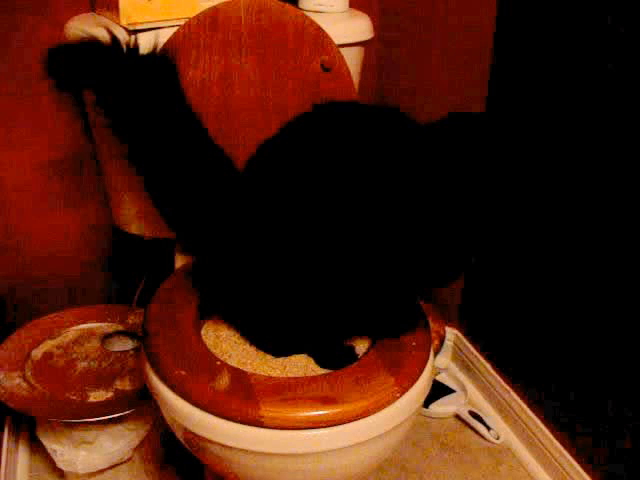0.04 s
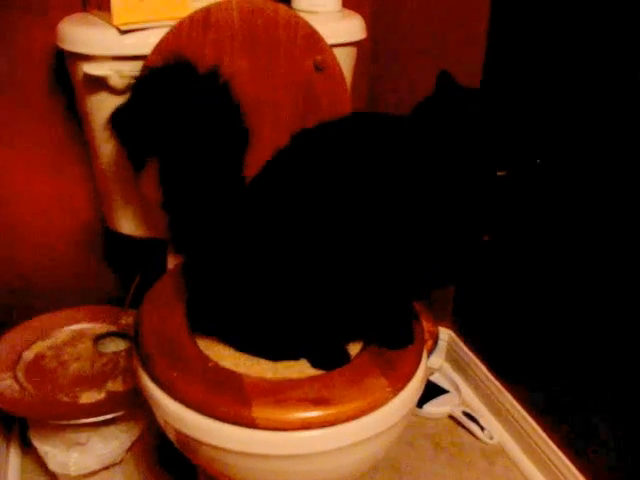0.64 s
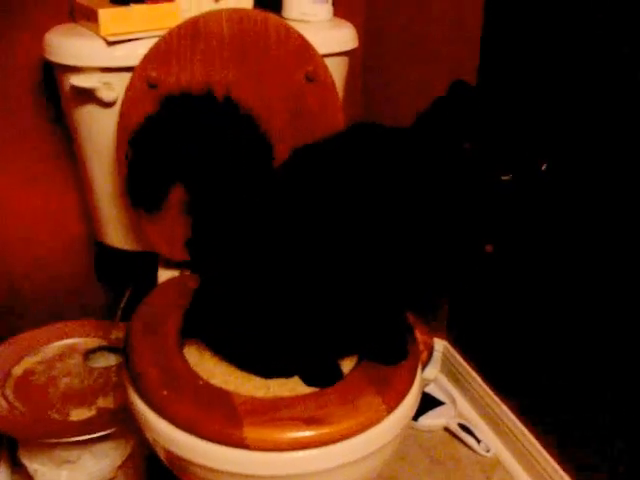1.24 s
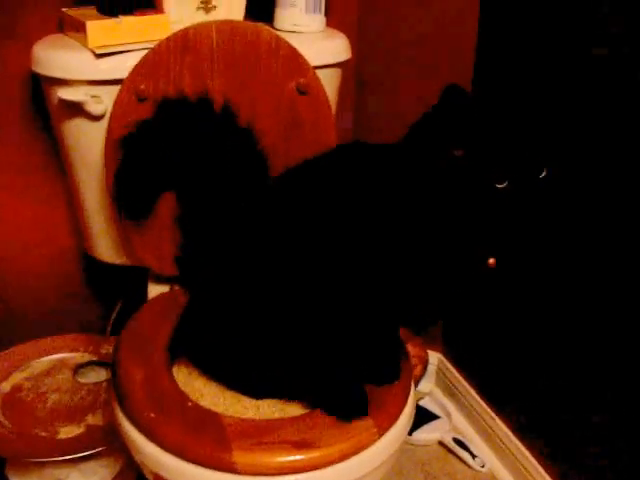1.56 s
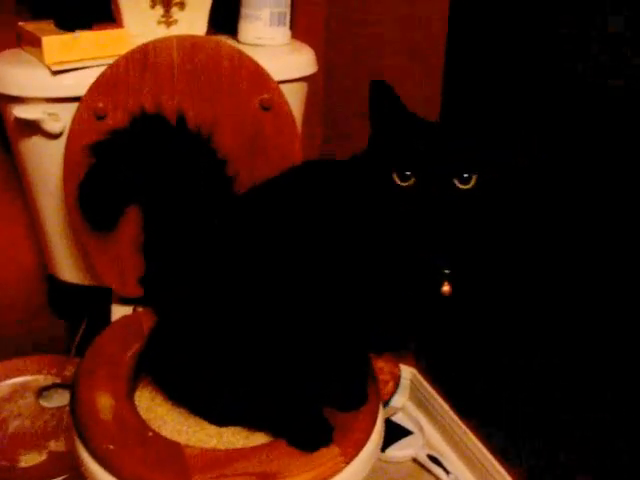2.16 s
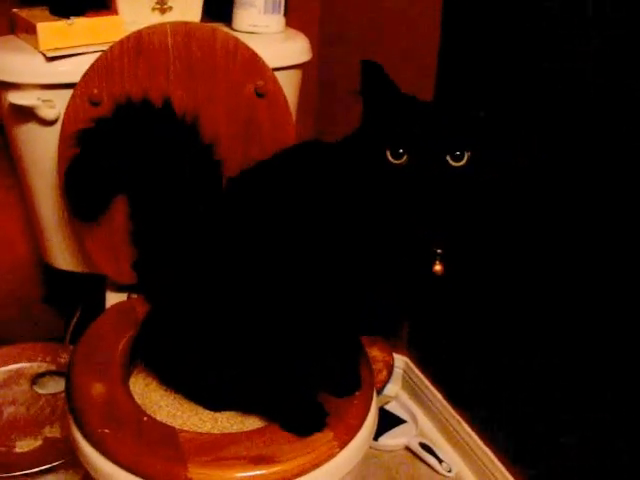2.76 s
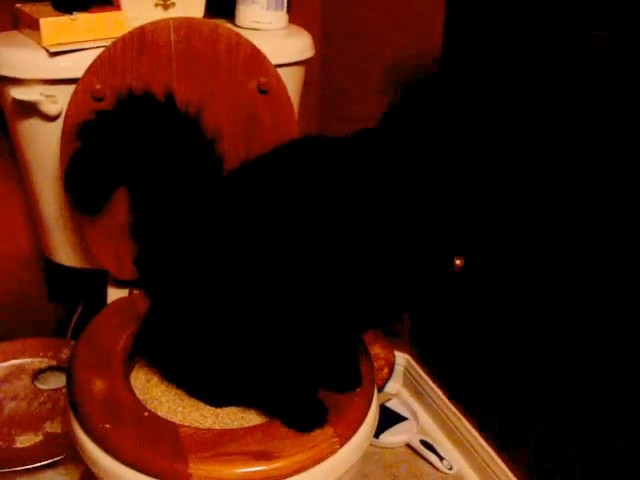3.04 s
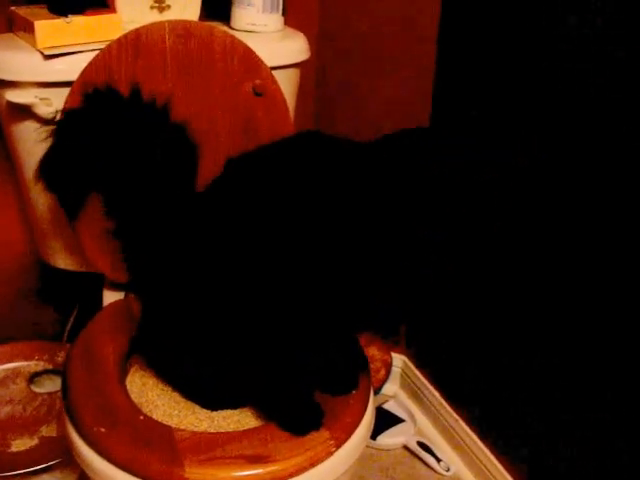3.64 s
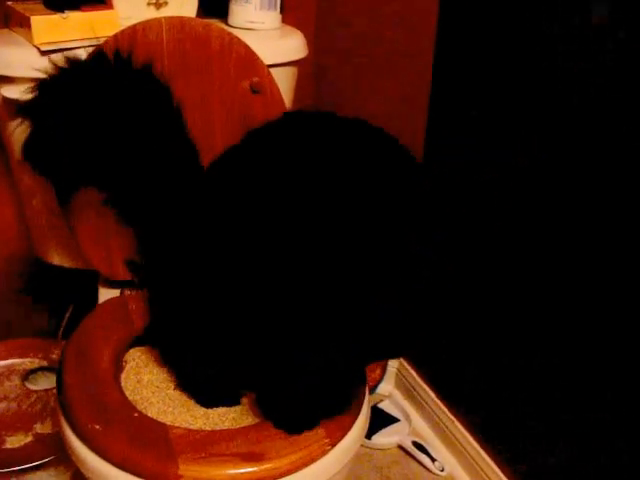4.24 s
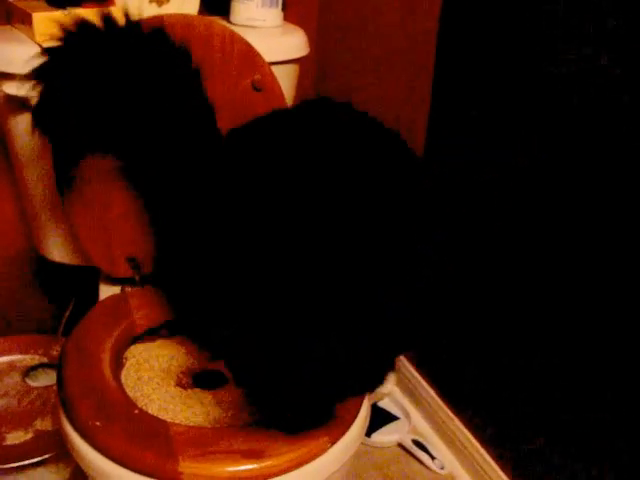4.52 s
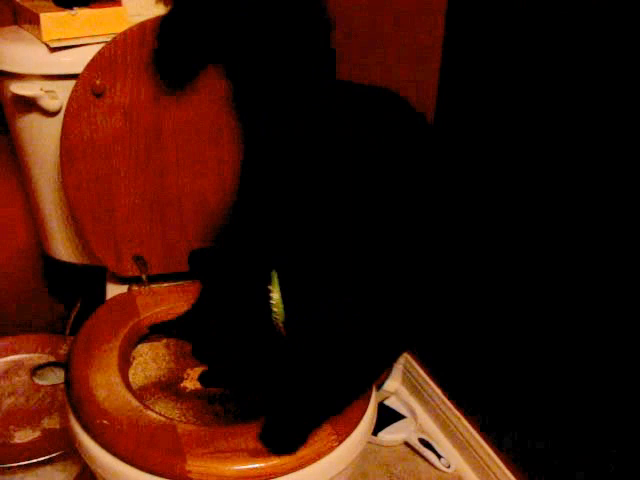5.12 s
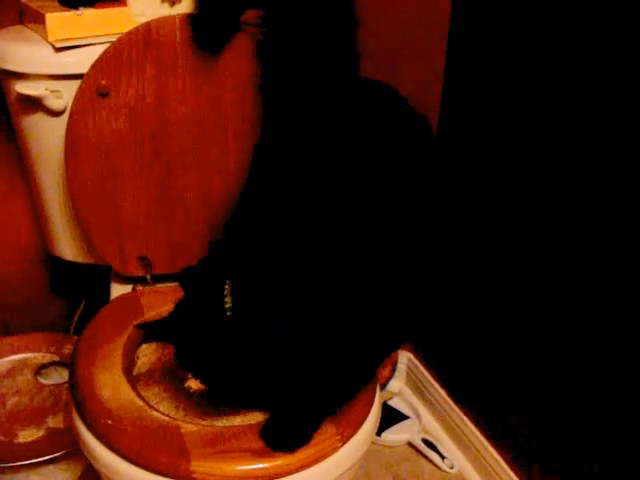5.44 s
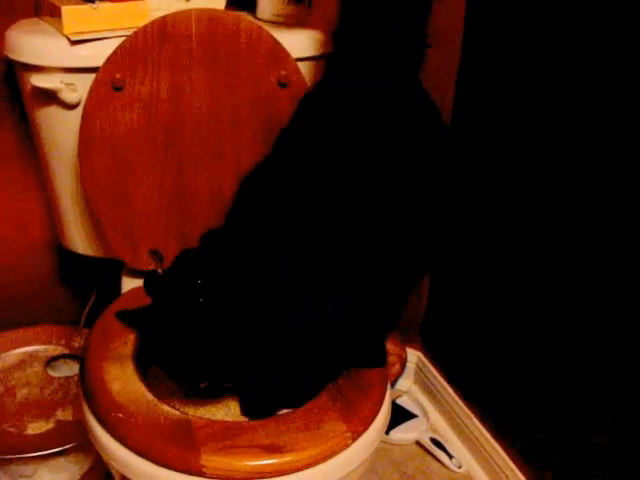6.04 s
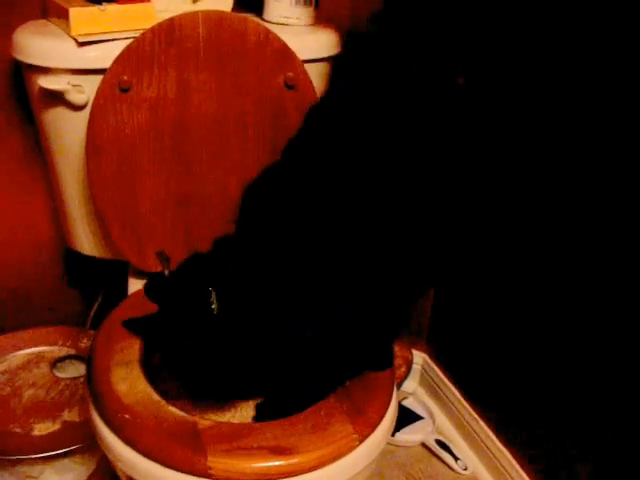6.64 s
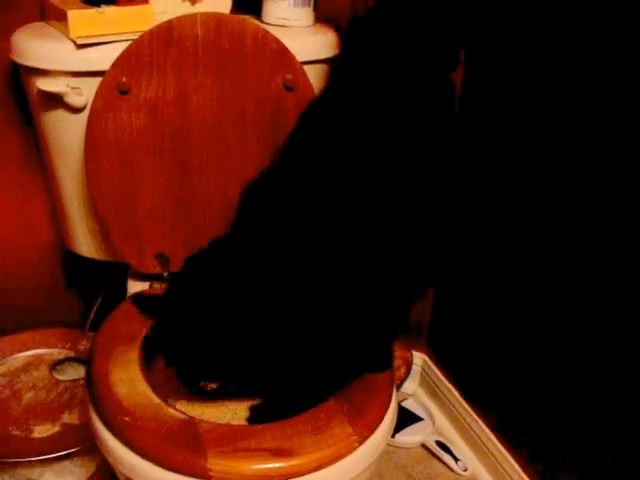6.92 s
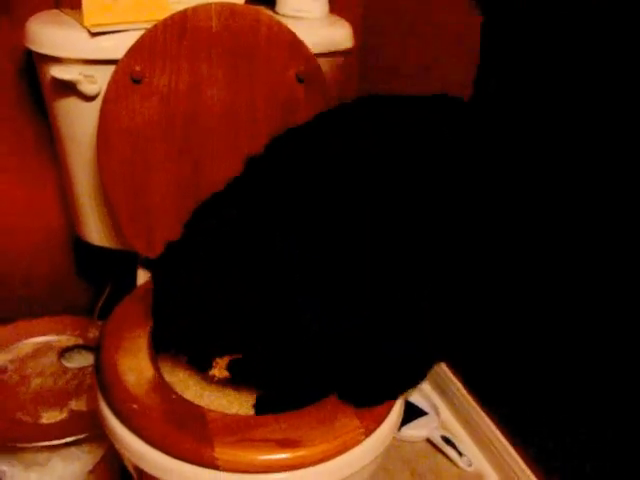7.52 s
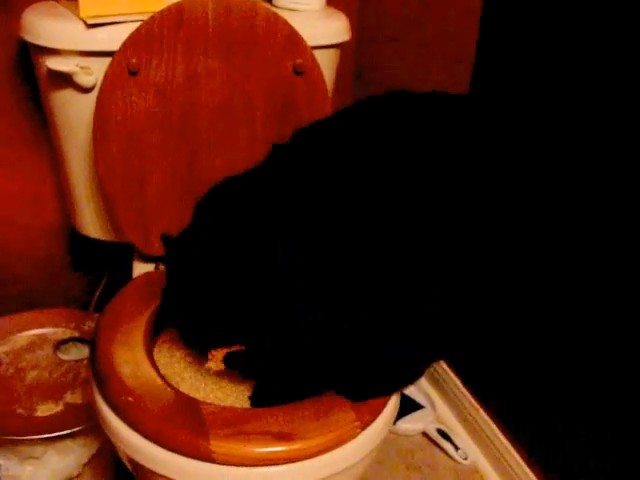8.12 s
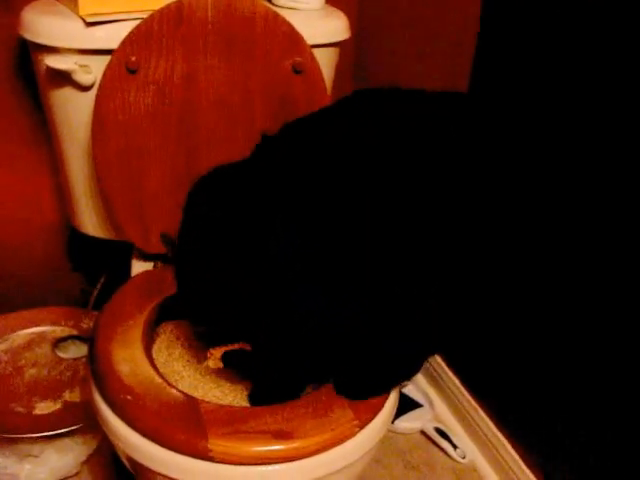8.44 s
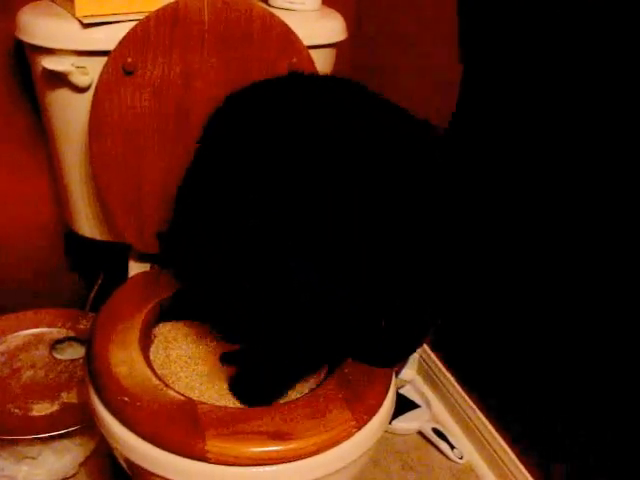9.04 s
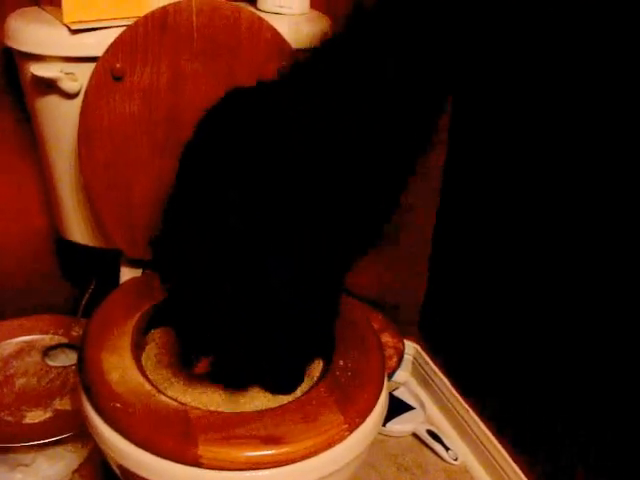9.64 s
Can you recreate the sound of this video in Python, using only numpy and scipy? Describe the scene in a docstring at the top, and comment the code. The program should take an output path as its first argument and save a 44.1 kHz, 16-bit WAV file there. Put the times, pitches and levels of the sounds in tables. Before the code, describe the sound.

A soft, steady hiss with a thin high whine fills a small bathroom throughout. A faint low drone, like a distant vehicle, sinks away by 3 seconds. A cat moves in a litter pan set in a wooden toilet seat: light, hollow knocks come at 0.2 and 1 second, with brief gritty scuffs around 0.7 and from 1.3 to 1.8 seconds. At about 3.2 seconds one short, shrill, wet squeak, like pursed lips calling the cat, rings off the close walls; it is by far the loudest sound. Around 4.5 seconds the paws crunch the granules again, followed by a knock and soft thump at 4.8. From 5 seconds on, quiet, uneven litter scuffs mix with tiny claw scratches, with a dull thump near 7.5 seconds. A slightly busier patch of shuffling, soft footfalls and scratching runs from 9 to 9.6 seconds.

```python
"""A small bathroom hisses, with a thin whine; a low drone, perhaps a vehicle outside, sinks away in 3 s.
Over it a cat bumps and turns round in a litter pan set in a toilet seat: its paws knock and ring the seat,
thump the pan and tumble the granules, and its claws catch in tiny slips.
Just after 3 s one shrill squeak, like pursed lips calling it, rings off the close walls:
air popping, fizzing and whistling through a tight wet gap."""
import sys
import numpy as np
from scipy import signal
from scipy.fft import rfft, irfft
from scipy.io import wavfile

SR = 44100
rng = np.random.default_rng(int(sys.argv[2]) if len(sys.argv) > 2 else 0)


def output_pcm(signal):
    """Save a mono or channel-first signal as 16-bit PCM at the path in sys.argv[1].

    Samples are clipped to [-1, 1] before scaling.
    """
    pcm = np.clip(np.atleast_2d(signal).T, -1, 1) * 32767
    wavfile.write(sys.argv[1], SR, np.round(pcm).astype(np.int16))


N = 435266
TIME = np.arange(N) / SR


def from_db(db):
    """Decibels to gain."""
    return 10 ** (np.asarray(db) / 20)


def rms_one(x):
    """Scale to unit power."""
    return x / np.sqrt(np.mean(x ** 2) + 1e-20)


def colour(x, spectrum):
    """EQ a steady signal with a curve of (f/Hz, level/dB) points; rms 1."""
    hz, db = np.transpose(spectrum)
    bins = np.maximum(np.fft.rfftfreq(len(x), 1 / SR), 1)
    gain = from_db(np.interp(np.log(bins), np.log(hz), db))
    return rms_one(irfft(rfft(x) * gain, len(x)))


def noise():
    """White noise, as long as the scene."""
    return rng.standard_normal(N)


def drift(per_s):
    """A random modulator gliding between values of spread 1."""
    knots = rng.standard_normal(N // 20)
    return np.interp(TIME * per_s, np.arange(len(knots)), knots)


def resonate(x, hz, width_hz, stages=1):
    """Two-pole resonators in series, each with a peak gain of 1."""
    r = np.exp(-np.pi * width_hz / SR)
    zeros = np.array([1, 0, -1]) * (1 - r * r) / 2
    poles = [1, -2 * r * np.cos(2 * np.pi * hz / SR), r * r]
    for _ in range(stages):
        x = signal.lfilter(zeros, poles, x + 1e-18)
    return x


def cut(x, hz, kind, order=2):
    """Butterworth low- or high-pass."""
    return signal.sosfilt(signal.butter(order, hz, kind, fs=SR, output="sos"), x)


def grains(per_s, spread_db):
    """Half a second of random clicks of uneven size."""
    count = SR // 2
    sizes = from_db(spread_db * np.minimum(rng.exponential(1, count), 4))
    signs = rng.choice([-1, 1], count)
    return sizes * signs * (rng.random(count) < per_s / SR)


def add(out, sound, start, length, db, rise, fall):
    """Mix in a sound that swells, holds at db for its length and dies away; times in seconds."""
    t = TIME[:len(sound)]
    envelope = (1 - np.exp(-t / rise)) * np.exp(-np.maximum(t - length, 0) / fall)
    at = int(start * SR)
    out[at:at + len(sound)] += (from_db(db) * envelope * rms_one(sound))[:N - at]


def bathroom(x, wet_db, t60_s=0.36):
    """Direct sound plus dense reflections from close hard walls, after a 3 ms pre-delay."""
    t = TIME[:SR // 2]
    tail = rng.standard_normal(len(t)) * from_db(-60 * t / t60_s) * (t > 0.003)
    tail *= from_db(wet_db) / np.sqrt(np.sum(tail ** 2))
    return (x + signal.fftconvolve(x, tail)[:N]) / np.sqrt(1 + from_db(wet_db) ** 2)


def room_hiss():
    """A bed of smooth air noise with a few narrow resonances that waver in level."""
    # spectrum of the room air: f/Hz, relative level/dB
    air = [(15, -40), (25, -9), (54, -7), (113, -8.5), (177, -2), (205, -2.5), (233, -3.5), (404, -6),
           (684, -4), (1130, -6), (1910, -6.5), (2400, -8.5), (3580, -6), (4600, -11), (10000, -18),
           (13000, -65.5), (22000, -120)]
    # resonances that colour the hiss: f/Hz, nominal width/Hz, level/dB
    air_peaks = [(585, 52, -70), (674.5, 93, -63.5), (912.5, 42, -69), (1237, 65, -69), (1684, 99, -67.5),
                 (1905, 84, -66.5), (3440, 50, -78), (3870, 360, -65.5)]
    out = from_db(-52.5) * colour(noise(), air)
    for hz, width, db in air_peaks:
        gain = from_db(db + 0.98 * drift(4.4))
        out += gain * rms_one(resonate(noise(), hz, 1.34 * width, stages=2))
    return out


def whine():
    """A thin band of noise, louder at first, that wanders slightly in pitch and level."""
    extra_db, settle_s = 8, 0.9
    hz = 3612 + 14 * drift(1.5)
    db = -62.5 + extra_db * np.exp(-TIME / settle_s) + 1.2 * drift(3)
    waver = cut(noise() + 1j * noise(), 14.7, "low", order=1)
    carrier = np.exp(2j * np.pi * np.cumsum(hz) / SR)
    return from_db(db) * rms_one(np.real(waver * carrier))


def drone():
    """A distant engine, only its bass passing the walls: the tone sinks and stops, the rumble recedes."""
    # resonances of the rumble: f/Hz, nominal width/Hz, relative level/dB
    rumble_bands = [(219, 15.4, -0.5), (240, 16, -4), (261, 15, -4), (342, 46, -6.5)]
    sag_hz_per_s, tone_fade_db_per_s = 6, 0.8
    rumble_hold_s, rumble_fade_db_per_s = 0.93, 9.5
    pitch_hz = (190 - sag_hz_per_s * TIME) * (1 + 0.004 * drift(8))
    sine = np.sin(2 * np.pi * np.cumsum(pitch_hz) / SR)
    tone = np.zeros(N)
    add(tone, sine, start=0.22, length=2.68, db=-65, rise=0.03, fall=0.08)
    rumble = sum(from_db(db) * rms_one(resonate(noise(), hz, 2 * width, stages=2))
                 for hz, width, db in rumble_bands)
    rumble_db = -56.5 - rumble_fade_db_per_s * np.maximum(TIME - rumble_hold_s, 0)
    tone_fader = from_db(2.2 * drift(4) - tone_fade_db_per_s * TIME)
    return tone_fader * tone + from_db(rumble_db) * rms_one(rumble)


def thumps():
    """The cat's weight gives the pan a low, damped push."""
    # soft footfalls: t/s, level/dB, f/Hz, length/s
    footfalls = [(0.21, -52, 194, 0.12), (4.464, -55.5, 198, .11), (4.80, -53, 186, 0.052),
                 (5.139, -60.5, 135, 0.033), (7.478, -50.5, 140, 0.028), (9.112, -58.5, 120, .06),
                 (9.205, -56.5, 229, 0.11)]
    out = np.zeros(N)
    for start, db, hz, length in footfalls:
        push = resonate(grains(per_s=3300, spread_db=-0.5), hz, width_hz=70)
        add(out, cut(push, 1.6 * hz, "low"), start, length, db, rise=0.0053, fall=0.022)
    return out


def shuffles():
    """Light paw strokes at an uneven pace, as rows of t/s, length/s, level/dB, depth/0-1."""
    # spells when the cat shifts about: from t/s, to t/s
    restless = [(1.35, 1.7), (5.6, 5.8), (8.95, 9.6)]
    gap_s, mean_length_s, db, depth = 0.24, 0.09, -56, 0.25
    starts = np.concatenate([np.arange(start, end, gap_s) for start, end in restless])
    chance = rng.random((len(starts), 2))
    return [(start + gap_s * late / 2, mean_length_s * (0.5 + stretch), db, depth)
            for start, (late, stretch) in zip(starts, chance)]


def scuffs():
    """Each stroke tumbles thousands of granules a second; a shallow one is thinner and duller."""
    # paw strokes through the litter: t/s, length/s, level/dB, depth/0-1
    strokes = [(0.722, 0.075, -50, 0.6), (1.792, .047, -51, .15), (4.458, 0.045, -46.5, 0.76),
               (4.563, 0.048, -49.5, 0.9), (5.13, .08, -51.5, 0.6), (5.351, .065, -54.5, 0.6),
               (6.768, 0.068, -55.5, .2), (6.881, .09, -54, 0.1), (7.172, .059, -52, .15),
               (7.322, 0.018, -45.5, 0.1), (7.36, 0.059, -53, .05), (8.412, 0.15, -55.5, 0.4),
               (9.087, 0.094, -45.5, .9), (9.479, .045, -46.5, .1)]
    # crunch spectrum of the granules: f/Hz, relative level/dB
    litter = [(60, -9), (180, 0.5), (350, -1), (700, -1), (1500, -1.5), (3000, -2), (5000, -1.5),
              (7000, -5.5), (10000, -1.5)]
    out = np.zeros(N)
    for start, length, db, depth in strokes + shuffles():
        low_cut_hz = 850 * (150 / 850) ** depth
        high_cut_hz = 3200 * (7000 / 3200) ** depth
        crunch = colour(grains(per_s=4200, spread_db=3.7), litter)
        crunch = cut(crunch, low_cut_hz, "high", order=1)
        crunch = cut(crunch, high_cut_hz, "low")
        add(out, crunch, start, length, db, rise=0.0032, fall=0.021)
    return out


def scratches():
    """A claw slips in tiny jerks that ring one high resonance; a narrow one chirps."""
    # claws catching on the pan: t/s, level/dB, f/Hz, width per stage/Hz, length/s
    catches = [(3.921, -58, 4260, 1800, .11), (4.779, -51, 2550, 200, .014), (5.627, -47, 2700, 400, 0.01),
               (6.362, -51, 2730, 250, .012), (7.312, -45, 3000, 1500, .004),
               (7.972, -57.5, 9100, 2000, 0.022), (9.253, -48.5, 3710, 800, 0.036),
               (9.256, -48.5, 5440, 1400, 0.03), (9.31, -55, 5460, 700, .025)]
    out = np.zeros(N)
    for start, db, hz, width_hz, length in catches:
        slips = resonate(grains(per_s=1500, spread_db=4.0), hz, width_hz, stages=2)
        add(out, slips, start, length, db, rise=0.0012, fall=0.0039)
    return out


def knocks():
    """A brief rattle of contacts cracks and rings the seat; the spot struck favours some modes."""
    # paws on seat and pan: t/s, level/dB, high cut/Hz, rattle length/s, favoured f/Hz, boost/dB
    bumps = [(0.2115, -36, 4180, 0.025, 1850, 6.5), (0.977, -38.5, 4020, .006, 1140, 24),
             (1.281, -52, 1700, .03, 1130, 14), (4.821, -43.5, 3000, 0.019, 1550, 9)]
    # modes of the seat: f/Hz, relative level/dB, t60/s
    seat_modes = [(192, -6, 0.091), (755, 8, 0.045), (1025, -7, 0.081), (1147, -2, 0.089),
                  (1520, -2.5, 0.021), (1870, -2.5, 0.032), (2050, -2.5, 0.026), (3230, -14, .015),
                  (4510, -14, .015)]
    boost_octaves, crack_over_body_db = 0.29, 10
    out = np.zeros(N)
    for start, db, high_cut_hz, length, favoured_hz, boost_db in bumps:
        contacts = np.zeros(SR // 2)
        add(contacts, grains(per_s=4000, spread_db=-0.5), 0, length, db, rise=0.0004, fall=0.0091)
        body = 0
        for hz, mode_db, t60 in seat_modes:
            nearness = np.exp(-(np.log2(hz / favoured_hz) / boost_octaves) ** 2)
            ring = resonate(contacts, hz, width_hz=np.log(1000) / np.pi / t60)
            body += from_db(mode_db + boost_db * nearness) * rms_one(ring)
        crack = from_db(crack_over_body_db) * rms_one(cut(contacts, 1130, "high"))
        blow = cut(rms_one(body) + crack, high_cut_hz, "low", order=4)
        at = int(start * SR)
        out[at:at + len(blow)] += rms_one(blow) * np.std(contacts)  # keeps the energy of the contacts
    return out


def flutter(per_s, jitter):
    """Half a second of unevenly spaced air pops."""
    spacing, size = rng.standard_normal((400, 2)).T
    at = (np.cumsum(np.exp(jitter * spacing)) / per_s * SR).astype(int)
    pops = np.bincount(at - at[0], weights=from_db(1.4 * size), minlength=SR // 2)
    return pops[:SR // 2]


def squeak():
    """Air pops through a tight wet gap into a small cavity, fizzes, and briefly locks into a whistle."""
    # spurts of air: t/s, length/s, pop level/dB, cavity f/Hz, whistle level/dB
    spurts = [(3.167, .003, -39, 4000, -60), (3.18, .007, -31, 4450, -47), (3.19, 0.03, -22.5, 4500, -29),
              (3.235, .006, -28, 4400, -27), (3.2445, 0.032, -25.5, 4400, -18.5),
              (3.2857, .006, -18.5, 4520, -14.5), (3.294, 0.01, -23.5, 4850, -25),
              (3.309, .043, -30, 4530, -28)]
    gap_opens_s, drying_s = 3.178, 0.021
    pops, fizz, whistle = np.zeros((3, N))
    whistle_hz = 4310 + 30 * drift(120)
    tone = np.sin(2 * np.pi * np.cumsum(whistle_hz) / SR) * from_db(1.9 * drift(200))
    for start, length, db, hz, whistle_db in spurts:
        cavity = resonate(flutter(per_s=450, jitter=0.34), hz, width_hz=550)
        cavity = resonate(cavity, hz, width_hz=890)
        add(pops, cut(cavity, 3950, "high", order=8), start, length, db, rise=0.00048, fall=0.002)
        spray = cut(grains(per_s=3600, spread_db=3.0), 3400, "high")
        wetness = np.exp(-abs(start - gap_opens_s) / drying_s)  # wettest as the gap opens
        fizz_db = db - 24.5 + 18 * wetness
        add(fizz, cut(spray, 10000, "low"), start, length, fizz_db, rise=0.001, fall=0.0045)
        at = int(start * SR)
        add(whistle, tone[at:at + SR // 2], start, length, whistle_db, rise=0.0012, fall=0.0042)
    return bathroom(pops + fizz, wet_db=-7) + bathroom(whistle, wet_db=-19)


def scene():
    """The cat and the squeak in the room, over a bed of hiss, whine and drone; mono."""
    cat = bathroom(scuffs() + knocks() + thumps() + scratches(), wet_db=-4)
    return (cat + squeak() + room_hiss() + whine() + drone())[None]


def record(dry):
    """The sound snaps in after a moment of silence, its top end cut steeply."""
    silence_s, fade_in_s, high_cut_hz = 0.092, 0.004, 10080
    fade_in = np.clip((TIME - silence_s) / fade_in_s, 0, 1)
    low_pass = signal.ellip(12, 0.1, 70, high_cut_hz, fs=SR, output="sos")
    return signal.sosfilt(low_pass, dry * fade_in)


dry = scene()
out = record(dry)
output_pcm(out)
```